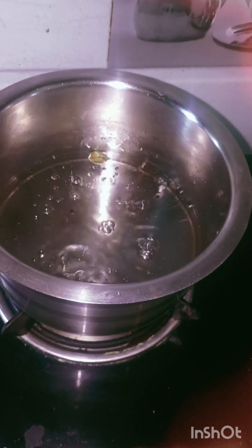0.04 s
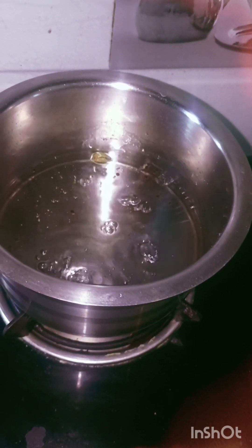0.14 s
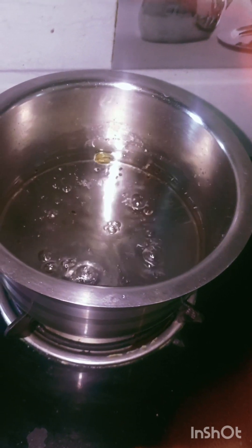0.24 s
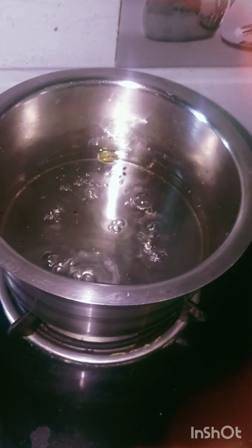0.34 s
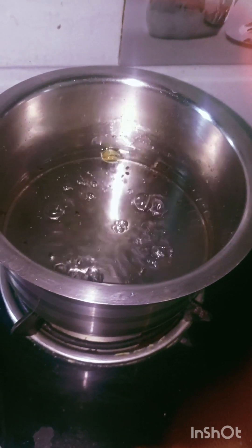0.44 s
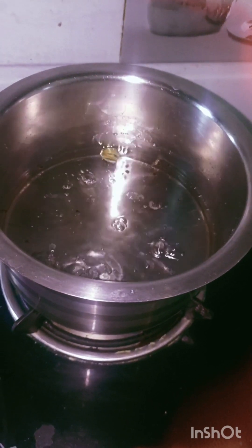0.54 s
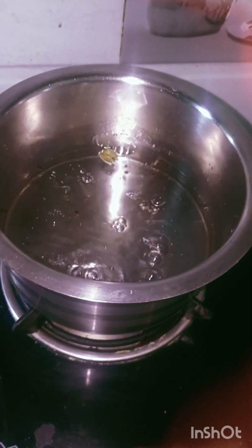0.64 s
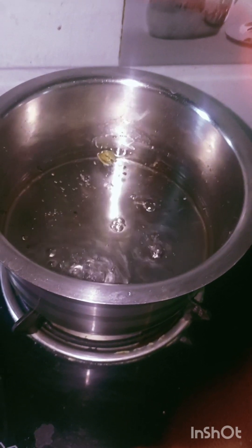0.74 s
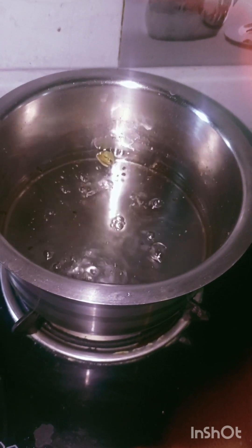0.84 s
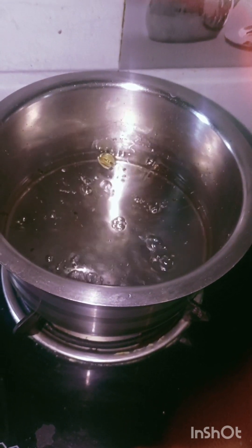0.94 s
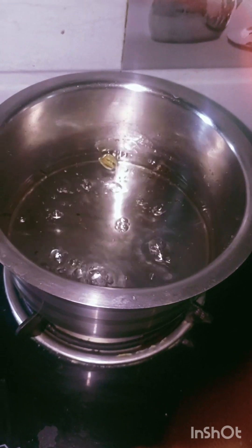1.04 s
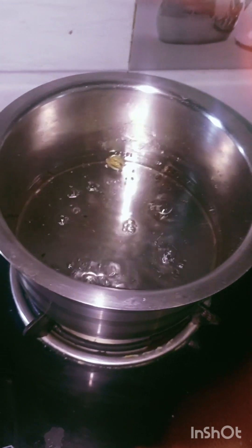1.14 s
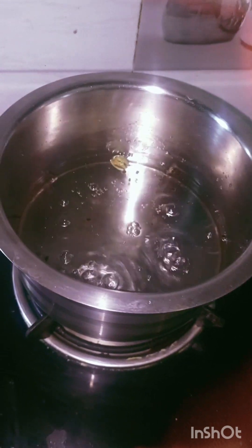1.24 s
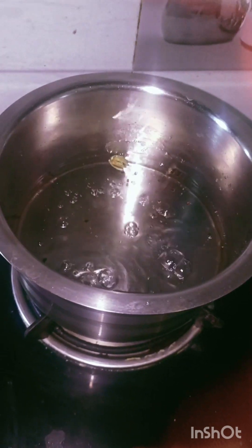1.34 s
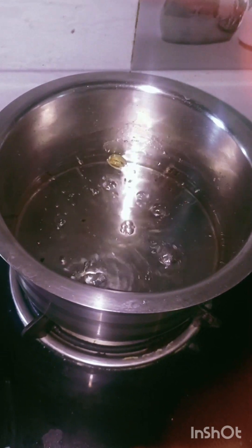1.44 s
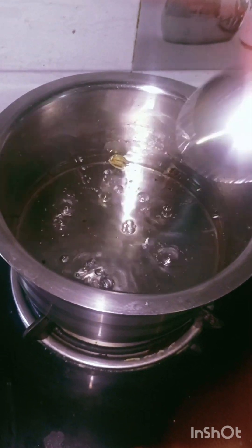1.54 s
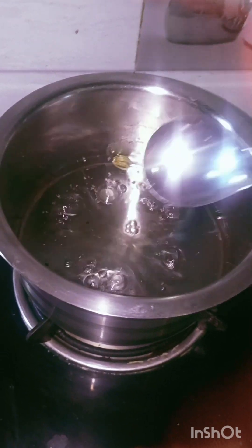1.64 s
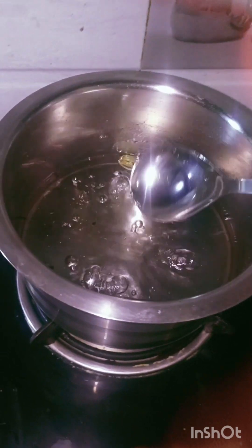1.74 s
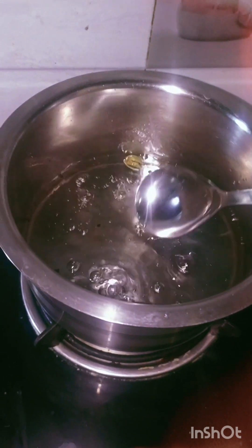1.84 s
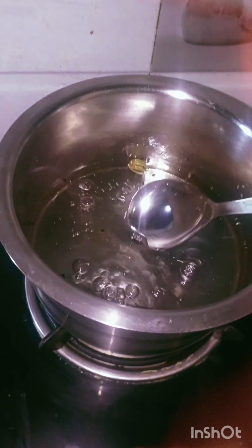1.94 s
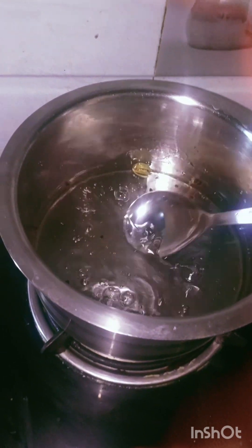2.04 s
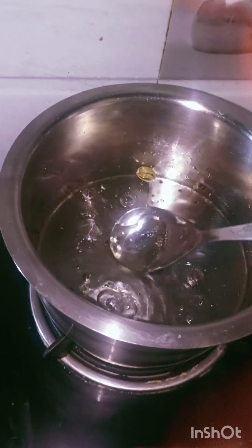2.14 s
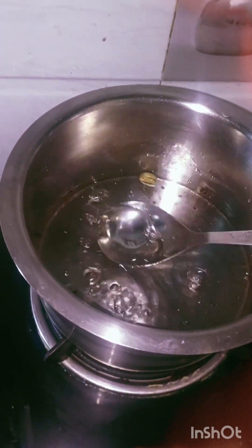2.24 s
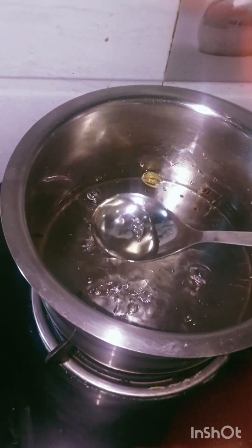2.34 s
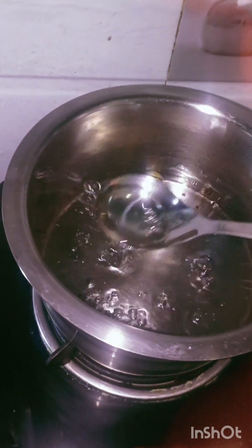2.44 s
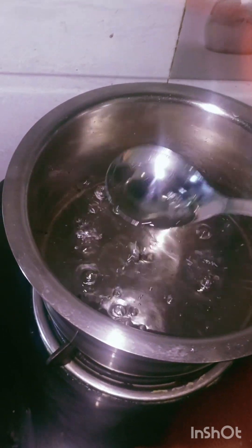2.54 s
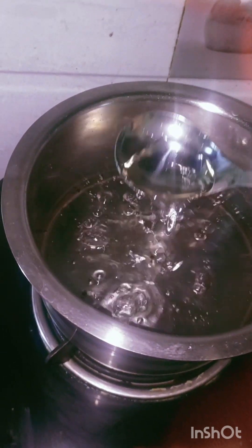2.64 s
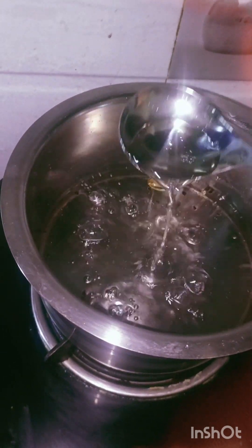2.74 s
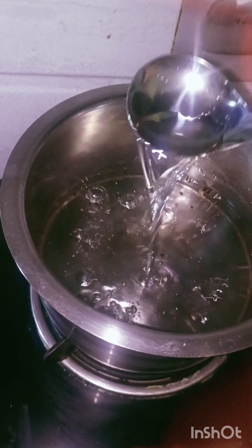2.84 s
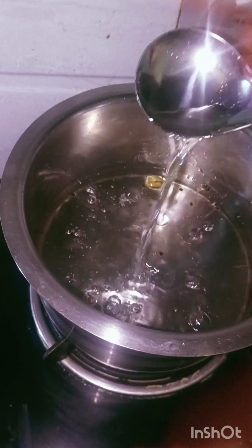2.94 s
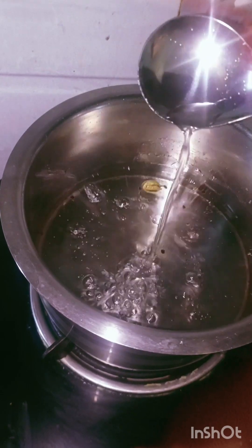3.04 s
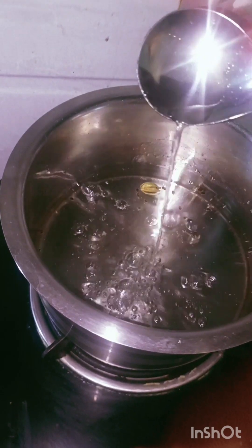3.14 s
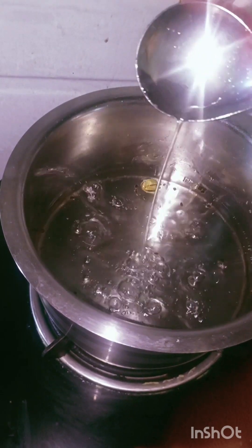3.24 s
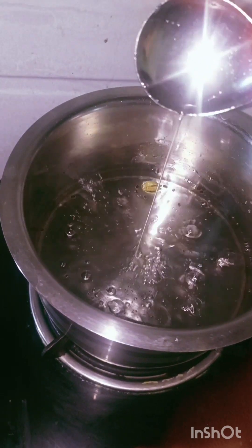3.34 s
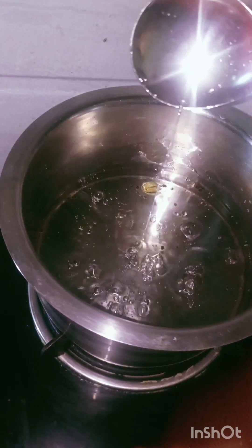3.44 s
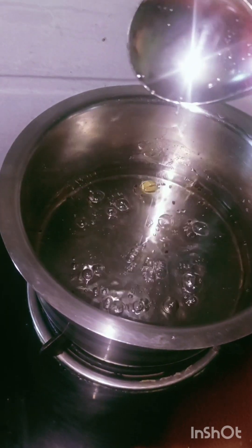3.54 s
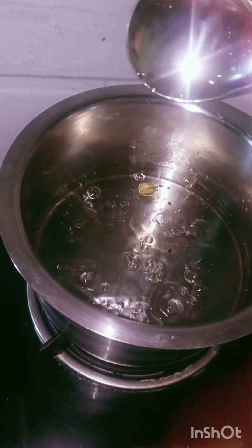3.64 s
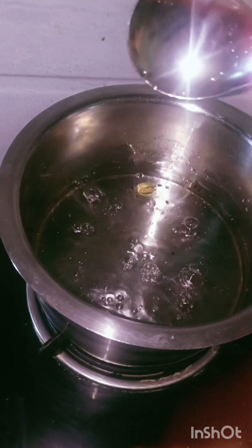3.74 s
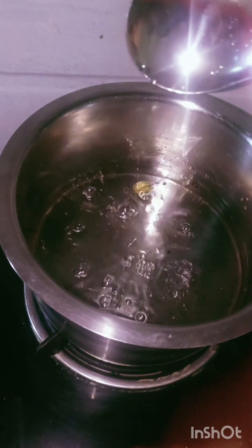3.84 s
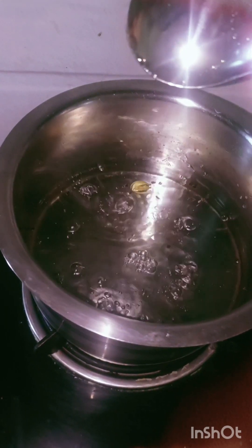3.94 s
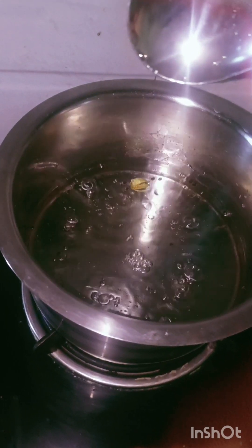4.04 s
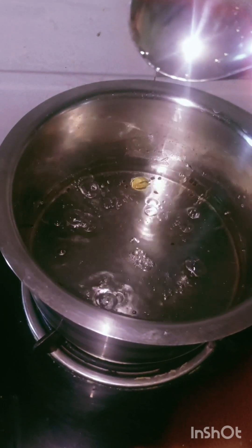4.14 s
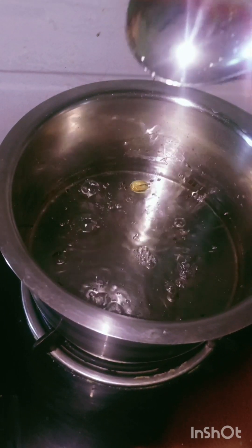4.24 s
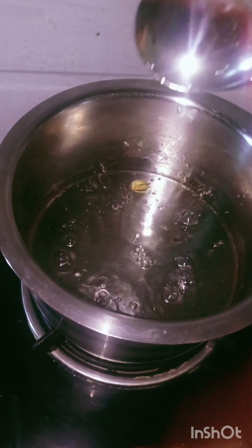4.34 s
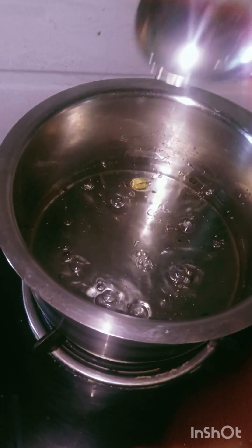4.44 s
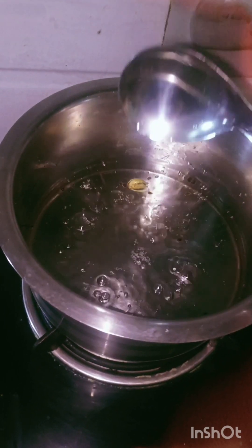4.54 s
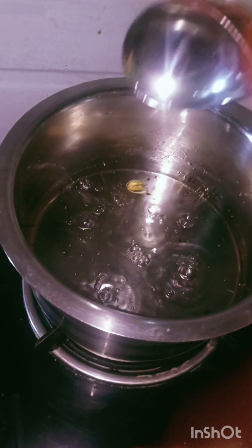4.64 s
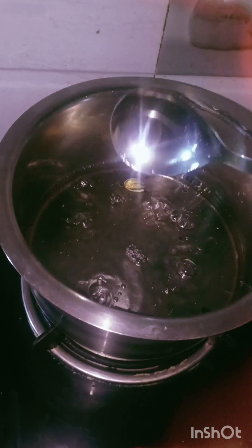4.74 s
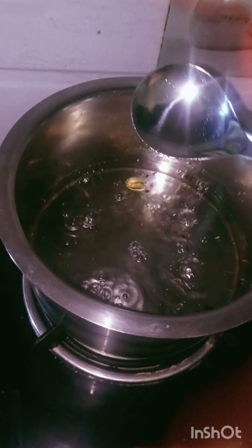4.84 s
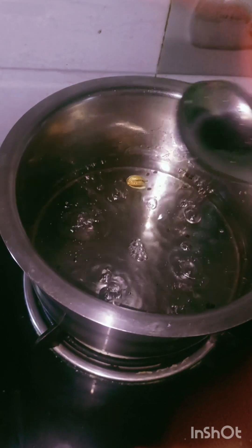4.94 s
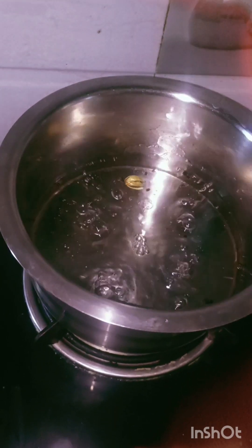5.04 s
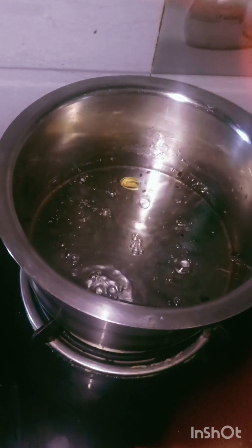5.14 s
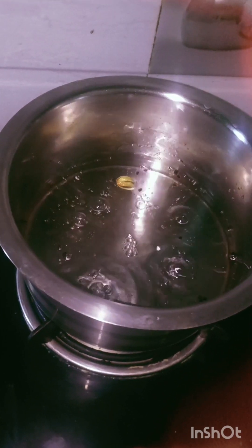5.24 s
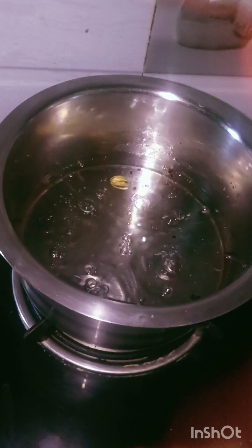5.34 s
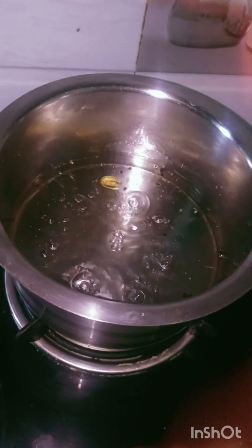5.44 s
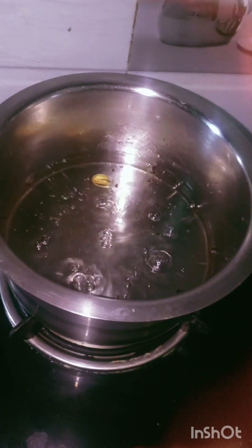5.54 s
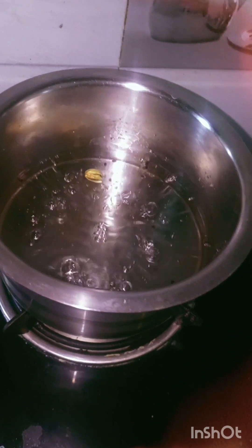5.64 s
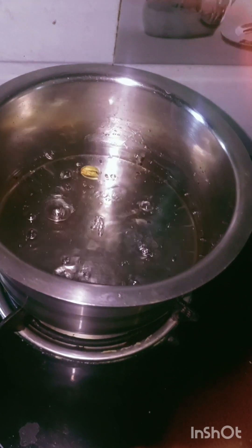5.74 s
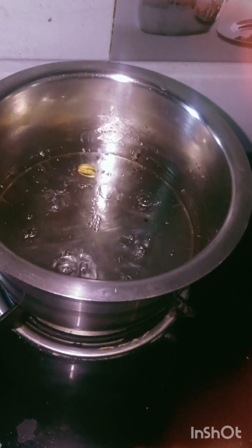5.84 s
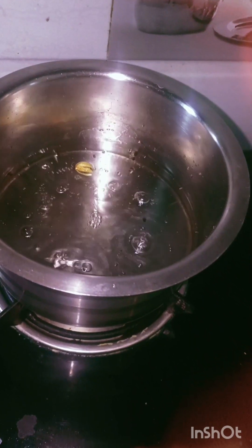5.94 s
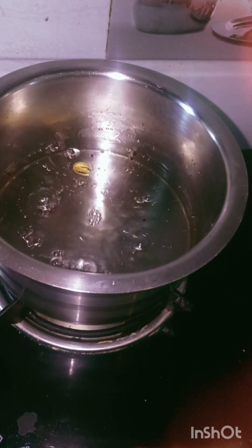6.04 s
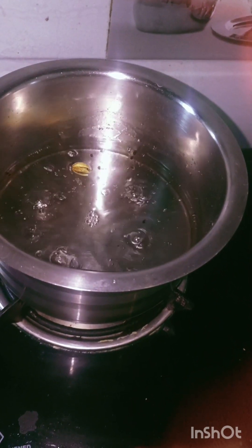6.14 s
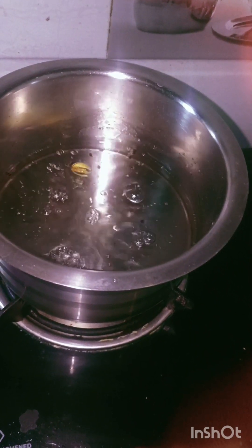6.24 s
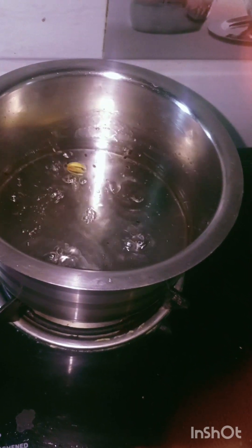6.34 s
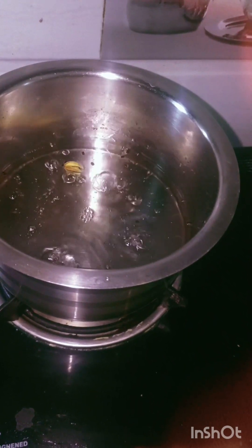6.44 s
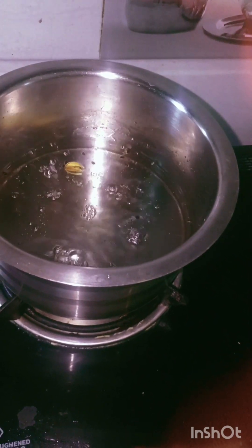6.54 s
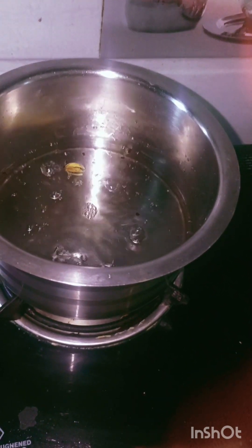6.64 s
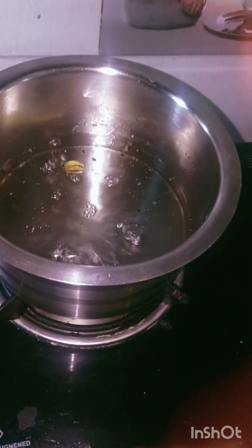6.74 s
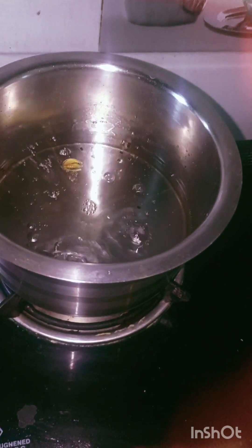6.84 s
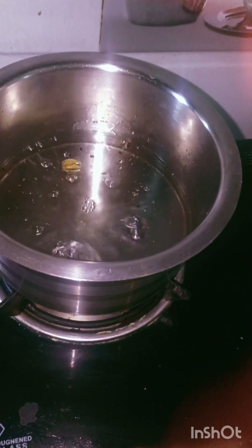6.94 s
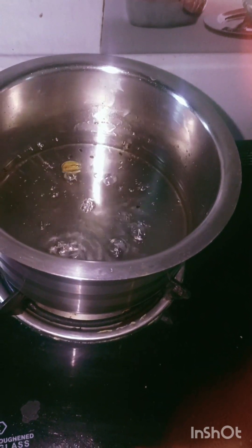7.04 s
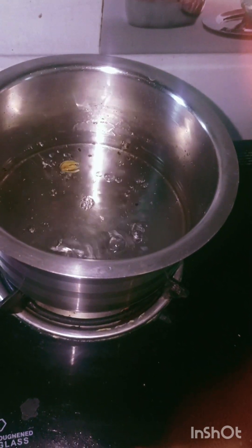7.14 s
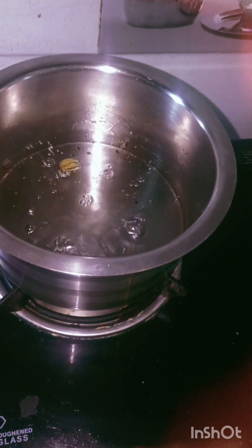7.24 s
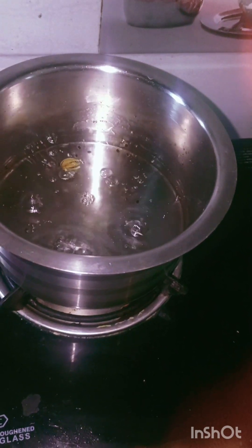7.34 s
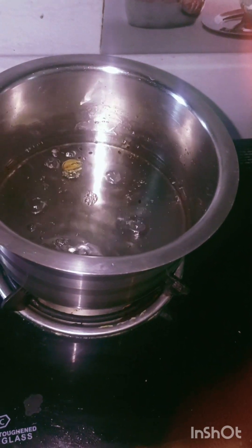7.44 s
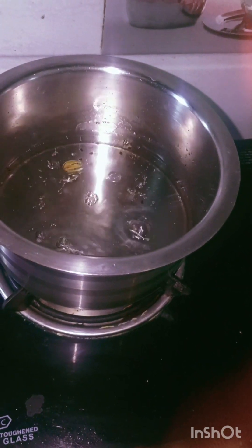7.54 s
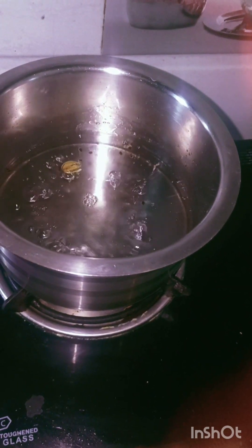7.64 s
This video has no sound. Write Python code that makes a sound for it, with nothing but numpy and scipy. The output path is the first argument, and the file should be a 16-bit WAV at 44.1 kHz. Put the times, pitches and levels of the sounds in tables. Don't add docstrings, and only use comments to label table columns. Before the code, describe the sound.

From 0 to 2 s, thick syrup simmers quietly in a steel pot near the microphone: soft uneven fizz, tiny sharp pops, duller bubbles, and a faint wall hum over a very low burner rumble. A faint drip comes near 1.1 s. At about 2.1 and 2.25 s a ladle knocks the pot, a hard clank then a deeper, brighter-edged one, with short ringing. Syrup falls back from 2.85 to 3.2 s in hollow gulps, the first loudest, with lively bubbling. From 3.5 to 5.5 s the boil is calmer, with scattered pops and a brief dip in hiss near 4.3. At 5.6 s a steel tray lands very loudly further off, bounces, and settles at 5.8. Dishes clatter densely at 6.13-6.3, again at 6.6 and 6.8, then weakly around 7. The echo is choked off, leaving faint puffs of hiss and small pops until about 7.7.

```python
import sys
import numpy as np
from scipy import signal
from scipy.fft import rfft, irfft, next_fast_len
from scipy.io import wavfile
from scipy.ndimage import uniform_filter1d

SR = 44100
rng = np.random.default_rng(int(sys.argv[2]) if len(sys.argv) > 2 else 0)


def store_wav(level_fs):
    pcm = np.round(np.clip(np.atleast_2d(level_fs), -1, 1) * 32767)
    wavfile.write(sys.argv[1], SR, pcm.T.astype(np.int16))


def gain_from_db(level_db):
    decades = np.asarray(level_db, float) / 20
    return 10 ** decades


N = 339479

# start_s, fizz_db, held_s
BOIL_SURGES = [(0.43, -55, 0), (0.58, -52, 0), (0.98, -48, 0.076), (1.2, -68.5, 0.44), (1.48, -59.5, 0.12),
               (1.76, -58.5, 0.077), (1.92, -48, 0), (2.06, -53.5, 0.69), (2.3, -41, 0.0097),
               (2.62, -62, 0.2), (2.86, -56.5, 0.5), (3.04, -47, 0.39), (3.19, -45, 0.04), (3.3, -65, 0.1),
               (3.61, -54, 0.12), (3.8, -63.5, 0.3), (4.5, -68, 1.4), (5.44, -59, 0), (5.64, -55.5, 1.62),
               (7.45, -61.5, 0)]
# freq_hz, level_db (per Hz)
FIZZ_COLOUR = [(530, -53.5), (900, -12), (1580, -2), (3880, -6), (5260, -11), (7200, -15), (9360, -44.5),
               (15800, -120)]
# freq_hz, level_db (per Hz)
HISS_COLOUR = [(4120, -7.5), (7000, -5), (9020, 3), (11000, -15), (15600, -13), (16400, -120)]
# freq_hz, level_db (per Hz)
AIR_COLOUR = [(15, -59), (43, -16), (102, 5), (252, -3.5), (352, -0.5), (1000, -9.5), (1100, -34),
              (2420, -120)]
# freq_hz, width_hz, level_db
POT_MODES = [(554, 8.4, -14), (812, 25, -6), (996, 12, -6.5), (1220, 54, 1.5), (1614, 41, -8.5),
             (2400, 56, -6.5), (2826, 14, -7.5), (2984, 24, 1), (3220, 23, 4.5), (3663, 78, -5),
             (4030, 62, -3), (4340, 43, -8.5), (5300, 400, -17)]
# start_s, peak_db, pitch_hz
SHARP_BUBBLES = [(0.0628, -51.5, 1135), (0.1268, -47.5, 5550), (0.236, -41, 5480), (0.428, -41, 2950),
                 (0.6347, -47, 4030), (0.9147, -46.5, 5350), (1.2071, -43.5, 4900), (1.283, -56.5, 1570),
                 (1.476, -38.5, 1630), (1.81, -50, 3830), (1.851, -49, 3640), (1.915, -43, 3820),
                 (2.0249, -40.5, 3100), (2.611, -37, 5650), (2.9703, -51, 4100), (3.163, -33, 3100),
                 (3.1885, -37, 2950), (3.087, -37.5, 3220), (3.3122, -49.5, 2600), (2.213, -45, 3500),
                 (3.36, -53, 5500), (3.5204, -45, 5350), (3.748, -48, 6000), (4.0163, -52, 3800),
                 (4.368, -49.5, 9070), (4.4808, -50, 3640), (4.6226, -50, 8100), (4.687, -51, 3440),
                 (5.194, -49, 3800), (5.207, -51, 3660), (5.0535, -52, 3780), (4.5753, -53, 5700),
                 (5.122, -52.5, 6800), (1.7545, -44, 2900), (5.3559, -43, 3660), (5.559, -46.5, 5300),
                 (7.215, -46, 1520), (7.6088, -49.5, 6260)]
# start_s, peak_db, pitch_hz
MUFFLED_BUBBLES = [(0.353, -63, 3640), (0.5617, -60, 3840), (0.766, -64.5, 1780), (0.9695, -53.5, 2040),
                   (1.4069, -58, 3320), (1.5813, -52.5, 5300), (1.666, -62.5, 3850), (1.7538, -58, 2960),
                   (2.721, -63, 3210), (3.028, -49, 2300), (3.099, -54, 3340), (3.467, -59.5, 1280),
                   (3.596, -46.5, 1445), (3.699, -60.5, 3540), (3.844, -60, 1140), (4.209, -58, 2450),
                   (4.5503, -58.5, 5640), (4.7865, -60, 3250), (5.039, -58.5, 3580), (5.083, -63, 5800),
                   (5.4243, -59.5, 1230), (5.484, -62.5, 4340), (7.1562, -72, 3670), (7.4385, -61.5, 5890),
                   (7.655, -61.5, 1220)]
# start_s, peak_db, pitch_hz
QUIET_MUFFLED_BUBBLES = [(3.9685, -54.5, 1130), (4.121, -57, 2400), (4.3969, -62, 6420), (4.572, -61, 5770),
                         (4.7343, -53.5, 3500), (4.818, -53, 4030), (4.85, -51, 4720), (4.8964, -48.5, 3220),
                         (4.982, -56, 3990), (5.1116, -50, 3900), (5.167, -53, 4770), (5.223, -50.5, 3330),
                         (5.421, -59, 1220), (5.5408, -63, 5220),
                         (0.0773, -53, 3900), (0.3654, -59, 1550), (0.5147, -63, 3010), (0.5895, -50.5, 1550),
                                (0.8275, -56, 3000), (0.8903, -50, 4140), (0.994, -45, 1630), (1.0286, -55, 3530),
                                (1.1517, -60.5, 2980), (1.2768, -57, 1600), (1.3199, -56, 1620), (1.461, -49.5, 3500),
                                (1.424, -54, 3550), (1.567, -47, 2430), (1.601, -48.5, 3050), (1.629, -56, 1540),
                                (1.739, -49, 2880), (1.944, -50, 5000), (2.411, -47, 3260)]
# start_s, peak_db, pitch_hz
SYRUP_DRIPS = [
    (1.076, -52.5, 528),
    (2.855, -31, 821),
    (2.896, -38, 808),
    (3.063, -43.5, 834),
    (3.1, -38, 817),
    (3.164, -36, 836),
    (3.212, -37, 813),
]
# times_pitch, level_db, t60_s
POT_AIR_MODES = [(1, 1.5, 0.11), (1.13, -3, 0.053), (1.22, -9, 0.082), (0.81, -15, 0.24), (2.08, -8, 0.04)]
# start_s, hum_db, held_s
HUM_SWELLS = [(0.47, -61.5, 0.039), (0.97, -66, 0.061), (1.17, -52.5, 0), (1.92, -64.5, 0.078),
              (2.13, -49.5, 0.019), (2.27, -47, .15), (2.6, -62, 0), (2.92, -53, .11), (3.23, -51.5, 0.09),
              (3.63, -53, 0.036), (4.47, -62.5, 0), (4.74, -60.5, 0.026), (5.48, -62, 0.063),
              (5.64, -47, 0.13), (5.74, -37.5, 0.015), (5.9, -55, 0.074), (5.2, -76, 0.15),
              (6.2, -49.5, 0.066), (6.66, -61, 0.069), (6.86, -59.5, 0.17), (7.02, -52.5, 0.081),
              (3.87, -69.5, 0.0067), (1.39, -70, 0.072), (1.79, -74.5, 0.017), (4.84, -70, 0.053)]
# freq_hz, level_db (per Hz)
HUM_COLOUR = [(270, -120), (306, -23.5), (334, -26), (349, -6.5), (364, -29.0), (420, -44.0), (500, -47.5),
              (522, -24.5), (545, -48.0), (620, -120)]
# start_s, rumble_db, held_s
BURNER_SWELLS = [
    (2.32, -54.5, .02),
    (3.88, -71, 0.041),
    (4.21, -63.5, 0.29),
    (4.88, -77, 0.031),
    (2.58, -70.5, 0.023),
    (5.73, -66.5, 0.23),
    (6.45, -70, 0.047),
    (7.33, -55, 0.025),
]
# freq_hz, level_db (per Hz)
BURNER_COLOUR = [(25, -120), (40, -19.0), (70, -4.5), (85, 9.0), (100, -5.0), (160, -21.0), (250, -120)]
# start_s, peak_db, low_knock_db, treble_db
LADLE_HITS = [
    (2.08, -33, -17, -29),
    (2.0878, -15.5, -4, -27),
    (2.2524, -32, -14, -20),
    (2.268, -18.5, 9.5, -42),
]
# freq_hz, level_db (per Hz)
LADLE_COLOUR = [(88, -40), (240, -27), (420, 7), (700, -2.5), (2600, -6.5), (4320, -19.5), (6910, -13),
                (16000, -53)]
# freq_hz, t60_s
POT_DECAY = [(100, 0.94), (400, 1), (1200, 0.58), (4000, 0.53), (15000, 0.98)]
# start_s, pitch_hz, level_db, t60_s
STEEL_RINGS = [(2.092, 3200, -41.5, 0.16), (2.2523, 4330, -34, 0.09), (2.26, 1200, -53.5, 0.91),
               (5.616, 3120, -20, 0.053), (5.822, 4170, -39, .07), (5.8223, 3400, -27, 0.054),
               (5.8226, 1100, -37.5, 0.077), (2.2525, 5400, -39, 0.051), (2.2523, 6150, -41, 0.042),
               (2.0885, 520, -35.5, 0.16), (3.031, 3200, -45.5, 0.15), (3.187, 2950, -44.5, 0.14),
               (6.1787, 5700, -26.5, 0.065), (6.1787, 5300, -24.5, 0.06), (6.213, 4710, -23, 0.1),
               (2.27, 350, -43.5, 0.4), (2.2535, 3220, -45, 0.063), (2.262, 4350, -53, 0.45),
               (2.0882, 760, -37, 0.06), (3.06, 830, -50, 0.35), (3.164, 1500, -45, 0.028),
               (2.2545, 2000, -46, 0.06), (5.616, 4170, -25, 0.052), (5.615, 5400, -22.5, 0.041)]
# start_s, peak_db, pitch_hz, swell_s
SOFT_BUMPS = [(.43, -60, 950, 0.0088), (1.61, -58.5, 1150, 0.021), (3.219, -54, 258, 0.012),
              (3.61, -69, 460, 0.028), (2.1, -39.5, 487, 0.0079), (2.271, -41, 328, 0.028),
              (2.27, -50, 150, 0.045), (2.856, -50.5, 1250, 0.0096), (4.85, -64, 1330, 0.026),
              (1.079, -58, 654, 0.021), (5.661, -38, 470, 0.025), (5.69, -43, 163, 0.027),
              (6.159, -39, 480, 0.049), (6.62, -45.5, 535, 0.026), (6.807, -51, 545, 0.014),
              (7.101, -65, 514, 0.011)]
# start_s, peak_db, low_knock_db, treble_db
TRAY_HITS = [
    (5.6158, -8.5, -19, -9),
    (5.652, -21, -6.5, -26.5),
    (5.68, -17.5, -13, -23.5),
    (5.698, -14.5, -10.5, -15),
    (5.8223, -19.5, -14.5, -10.5),
]
# freq_hz, width_hz, level_db
TRAY_MODES = [(1186, 66, 4), (1550, 36, 10.5), (1865, 62, -2), (2150, 98, 5), (2590, 67, -5.5),
              (2950, 100, 6.5), (3210, 110, -9), (3640, 110, -6.5), (4174, 130, -8), (4600, 90, -3.5),
              (5350, 60, -1), (5640, 60, -3.5), (5860, 140, -7.5)]
# freq_hz, level_db (per Hz)
TRAY_COLOUR = [(150, -15.5), (254, -25), (341, 12), (1040, -14), (1530, -8.5), (3200, -4.5), (5570, -14),
               (7620, -27.5), (10800, -38), (16000, -37.5)]
# start_s, peak_db, low_knock_db, treble_db
DISH_HITS = [(6.1324, -16, -14.5, -12), (6.1482, -18.5, -10.5, -39), (6.1787, -15, -17, -12),
             (6.2045, -15.5, -24.5, -17), (6.2165, -14, -33, -14), (6.227, -17.5, -23, -19),
             (6.2504, -24.5, -6.5, -5), (6.269, -19.5, -13.5, -14.5), (6.5941, -18, -19.5, -11.5),
             (6.612, -23, -21.5, -17), (6.632, -22, -26, -14.5), (6.652, -22.5, -14.5, -14.5),
             (6.783, -24.5, -53, -14.5), (6.8013, -27.5, -19, -15.5), (6.82, -35, -10.5, -15),
             (6.9184, -35, -13, -11), (7.0, -35.5, -12, -11), (7.0069, -33, -14, -33),
             (7.035, -36.5, -5.5, -18.5)]
# freq_hz, width_hz, level_db
DISH_MODES = [(316, 27, 8), (728, 26, 2.5), (1233, 90, -2), (1526, 49, 1.5), (2149, 37, -6.5),
              (2360, 22, 1.5), (2657, 35, -6), (2962, 47, 1.5), (3220, 105, -8.5), (3500, 110, 5),
              (3890, 20, -2), (4760, 40, 1), (5350, 65, -3.5), (5700, 130, 3.5),
              (6160, 36, -3), (8200, 75, -0.5), (12000, 120, 6), (13050, 130, 5.5), (14500, 370, 3.5)]
# freq_hz, level_db (per Hz)
DISH_COLOUR = [(150, -13), (254, -15.5), (341, 6.5), (1040, -15.5), (1210, -10), (1390, -17.5), (1530, -3),
               (3550, -6.5), (5570, -10.5), (7620, -26), (10800, -33.5), (11600, -43.5), (16000, -40)]
# freq_hz, t60_s
KITCHEN_DECAY = [(100, 0.6), (400, 0.93), (1200, 1), (4000, 0.84), (8000, 0.89), (15000, 0.65)]
# time_s, level_db
LAST_TAIL_CUT = [
    (0, 17),
    (7.06, 2),
    (7.17, -2),
    (7.7, -24.5),
]
# start_s, peak_db
TREBLE_PUFFS = [(0.162, -71), (0.2553, -82), (0.342, -79), (0.3676, -69), (0.4279, -66), (0.5866, -62),
                (0.6302, -53.5), (0.6679, -74), (0.7267, -69), (0.778, -65), (0.9398, -59), (0.9837, -58),
                (1.059, -57.5), (1.197, -58.5), (1.2146, -57), (1.3872, -66), (1.494, -68), (1.5388, -57.5),
                (1.8507, -58.5), (1.914, -58.5), (1.952, -61), (2.0887, -38.5), (2.131, -51), (2.1919, -63),
                (2.2528, -31.5), (2.4097, -56.5), (2.5062, -60), (2.534, -65.5), (2.585, -58), (2.61, -51),
                (2.676, -52.5), (2.8499, -63.5), (2.9053, -54), (2.9713, -54), (3.0203, -50),
                (3.0898, -40.5), (3.103, -53), (3.068, -55), (3.1887, -51), (3.259, -69), (3.3585, -60),
                (3.4638, -54.5), (3.5225, -57.5), (3.5495, -57), (3.6726, -73), (3.7466, -56.5),
                (3.799, -64), (3.8412, -59), (3.912, -62), (3.9838, -80), (4.103, -59), (4.3246, -70),
                (4.369, -65.5), (4.4594, -58), (4.4973, -58), (4.6109, -60), (4.9791, -70), (5.017, -55),
                (5.2014, -52.5), (5.2795, -79), (5.4228, -60), (5.4705, -64), (5.4954, -68),
                (5.5424, -62.5),
                (7.1705, -86), (7.27, -70.5), (7.323, -67.5), (7.463, -67.5), (7.5276, -65.5),
                      (7.565, -64), (7.6133, -65.5)]
# freq_hz, level_db
PUFF_COLOUR = [(1000, -24.5), (2500, -9.5), (6000, 5.5), (7000, -10.0), (9000, 1.0), (11000, -7.5),
               (15800, -2.0), (16300, -120)]
# freq_hz, threshold_db
FILTER_THRESHOLD = [(100, -67), (500, -57.5), (1000, -76.5), (1300, -88), (6000, -77.5), (8000, -83),
                    (15000, -57.5)]
# freq_hz, likeness
MIC_LIKENESS = [(60, 0.28), (130, 0.97), (290, 0.76), (640, 0.65), (1410, 0.069), (3100, 0.41), (6820, 0.3),
                (15000, 0.36)]
# freq_hz, left_minus_right_db
MIC_LEAN = [(60, 1), (700, -0.5), (1300, 2.5), (2400, -1), (3800, -2.5), (5700, -8.5), (6900, -10.5),
            (7900, 18.5), (9000, 22.5), (10000, 22), (11500, 3.5), (15000, 5)]
# freq_hz, gain_db
BAND_LIMIT = [(16000, 0), (16250, -22), (17000, -45)]


def simmer():
    boil_db = swells(BOIL_SURGES, rise=188, fall=350, rest_db=-71.5)
    fizz = coloured(noise(N, gates(depth_db=8, shared_db=0.0, hold_s=0.025, size=2)), FIZZ_COLOUR)
    fizz = rung(fizz * crackle(rate=55, life_s=0.009), POT_MODES, between_db=-16, sharp=1.1)
    fizz = gain_from_db(boil_db - 7.0) * unit(fizz)
    hiss = coloured(noise(N, gates(depth_db=8.0, shared_db=4.0, hold_s=0.018, size=4)), HISS_COLOUR)
    hiss = gain_from_db(0.41 * boil_db - 47.5) * hiss
    air = coloured(noise(N, gates(depth_db=2, shared_db=1.5, hold_s=0.05, size=1)), AIR_COLOUR)
    return gap() * (fizz + hiss) + gain_from_db(-77.5) * air


def crackle(rate, life_s):
    size = gain_from_db(2.6 * np.minimum(rng.exponential(size=N), 2.2))
    starts = (rng.random(N) < rate / SR) * size
    return unit(0.9 + signal.lfilter([1], [1, -np.exp(-1 / (life_s * SR))], starts))


def bubbles():
    out = np.zeros((2, N))
    for s, db, hz in SHARP_BUBBLES:
        add(out, s, gain_from_db(db) * burst(hz, cycles=2.34, width=0.13, t60=0.077, wet_db=-12.5))
    pops = [(s, db - 13.0, hz) for s, db, hz in QUIET_MUFFLED_BUBBLES]
    ping_db = -22
    for s, db, hz in MUFFLED_BUBBLES + pops:
        add(out, s, gain_from_db(db + ping_db) * burst(hz, cycles=1.0, width=0.16, t60=0.14, wet_db=-ping_db))
    return out


def burst(hz, cycles, width, t60, wet_db):
    t = np.arange(SR // 6) / SR
    u = t * hz / cycles
    ping = 5 * (u * np.exp(-u)) ** 2 * np.sin(2 * np.pi * hz * t * (1.003 + 0.012 * u))

    def answer(f, s):
        near = np.exp(-0.5 * (np.log((f + 1) / hz) / width) ** 2) + 0.0028
        return near * resonances(POT_MODES, f, between_db=-14.5, sharp=1.0) * gain_from_db(-60 * s / t60)

    tail = noise(len(t), answer, order=512)
    tail = gain_from_db(wet_db) * tail * (1 - np.exp(-t / 0.001)) / np.std(tail[:, :400])
    return ping * lean(hz)[:, None] + tail


def drips():
    out, t = np.zeros((2, N)), np.arange(SR // 6) / SR
    for s, db, hz in SYRUP_DRIPS:
        ring = 0
        for ratio, level, t60 in POT_AIR_MODES:
            phase = 0.15 * rng.random((2, 1))
            fade = gain_from_db(level + rng.normal(0, 1.0) - 60 * t / t60)
            ring = ring + fade * np.sin(2 * np.pi * (hz * ratio * t + phase))
        ring = 0.58 * ring * (1 - np.exp(-t / 0.00047))
        splash = gain_from_db(-22.0) * burst(hz, cycles=4.2, width=0.33, t60=0.33, wet_db=7)
        add(out, s, gain_from_db(db) * (ring + splash))
    return out


def hum():
    hum_db = swells(HUM_SWELLS, rise=390, fall=395, rest_db=-80)
    wall = coloured(rng.standard_normal(N), HUM_COLOUR)
    beat = np.abs(signal.hilbert(wall))
    wall = unit(wall / (beat + 0.89))
    return gain_from_db(hum_db + [[-1.5], [1.5]]) * wall


def ladle():
    return clatter(LADLE_HITS, POT_MODES, LADLE_COLOUR, POT_DECAY, between_db=-10.0, wet_db=-18.5,
                   crack_s=0.082, rise_s=0.00075)


def clatter(hits, modes, tone, room, between_db, wet_db, crack_s, rise_s):
    out, t = np.zeros((2, N)), np.arange(SR * 3 // 4) / SR
    short = len(t) // 4
    for s, db, low_db, high_db in hits:
        blow = [(170, low_db - 19.0), (340, low_db + 0.0), (800, low_db + 13.5), (1100, 0.017), (5600, 0.023),
                (7600, high_db + 17.5), (10500, high_db + 24.5), (15500, high_db + 28.5)]

        def colour(f, u):
            return gain_from_db(along(tone, f) + along(blow, f))

        def echo(f, u):
            return colour(f, u) * gain_from_db(-60 * u / along(room, f))

        crack = np.pad(unit(noise(short, colour)), [(0, 0), (0, len(t) - short)])
        crack = 0.88 * crack * gain_from_db(-60 * t / crack_s) * (1 - np.exp(-t / rise_s))
        tail = noise(len(t), echo)
        tail = gain_from_db(wet_db) * tail / np.std(tail[:, :2000]) * (1 - np.exp(-t / 0.0011))
        add(out, s, gain_from_db(db) * (crack + tail))
    return shut(rung(out, modes, between_db, sharp=1.73))


def rings():
    out, t = np.zeros((2, N)), np.arange(SR // 2) / SR
    blur = 0.04
    for s, hz, db, t60 in STEEL_RINGS:
        steps = rng.standard_normal((2, 1, len(t)))
        drift = np.cumsum(steps, axis=2) * np.sqrt(blur * hz / SR) / (2 * np.pi)
        turns = hz * t * [[[1]], [[1.012]]] + drift + rng.random((2, 2, 1))
        pair = np.sin(2 * np.pi * turns).sum(axis=0)
        add(out, s, gain_from_db(db - 60 * t / t60) * lean(hz)[:, None] * pair * (1 - np.exp(-t / 0.00039)))
    return out


def thuds():
    out, t = np.zeros((2, N)), np.arange(SR // 2) / SR
    for s, db, hz, swell_s in SOFT_BUMPS:
        def near(f, u):
            return np.exp(-0.5 * (np.log((f + 1) / hz) / 0.48) ** 2) + 0 * u

        bump = unit(noise(len(t), near, order=2048))
        add(out, s, gain_from_db(db) * bump * np.e * t / swell_s * np.exp(-t / swell_s))
    return out


def tray():
    return clatter(TRAY_HITS, TRAY_MODES, TRAY_COLOUR, KITCHEN_DECAY, between_db=-7.0, wet_db=-15.0,
                   crack_s=0.064, rise_s=0.00043)


def dishes():
    clash = clatter(DISH_HITS, DISH_MODES, DISH_COLOUR, KITCHEN_DECAY, between_db=-9.5,
                    wet_db=-18.0, crack_s=0.13, rise_s=0.00071)
    time_s, level_db = np.transpose(LAST_TAIL_CUT)
    return gain_from_db(np.interp(np.arange(N) / SR, time_s, level_db)) * clash


def burner():
    rumble_db = swells(BURNER_SWELLS, rise=110, fall=90, rest_db=-85.5)
    middle, side = coloured(rng.standard_normal((2, N)), BURNER_COLOUR)
    return gain_from_db(rumble_db) * unit(middle + 0.12 * side * [[1], [-1]])


def puffs():
    out, t = np.zeros((2, N)), np.arange(SR // 16) / SR
    faint = rng.random((90, 2)) * [N / SR, 6] - [0, 80]
    timed = np.array(TREBLE_PUFFS) - [0, 9.5]
    for s, db in np.vstack([timed, faint]):
        held_s = 0.013 * gain_from_db(np.clip(rng.normal(0, 4), -7, 4))
        patches = gates(depth_db=3, shared_db=5, hold_s=0.008, size=6)

        def treble(f, u):
            return gain_from_db(along(PUFF_COLOUR, f)) * patches(f, u)

        block = unit(noise(len(t), treble))
        tick = 2.8 * gain_from_db(-60 * t / 0.003)
        add(out, s, gain_from_db(db + 4.0) * block * (1 / (1 + (t / held_s) ** 6) + tick))
    return out


def gates(depth_db, shared_db, hold_s, size):
    def shape(hz, s):
        band = np.arange(len(hz)) // size
        jumps = rng.random((band[-1] + 2, len(s))) < s[1] / hold_s
        step = np.cumsum(jumps, axis=1)
        gain = np.take_along_axis(rng.standard_normal(step.shape), step, axis=1)
        gain = uniform_filter1d(gain, size=2, axis=1)
        shared = shared_db * np.clip(gain[-1], -2, 1)
        return gain_from_db(np.clip(depth_db, 0, 5) * gain[band] + shared)
    return shape


def gap():
    middle_s, half_s, depth_db = 4.283, 0.04, -12
    return gain_from_db(depth_db / (1 + ((np.arange(N) / SR - middle_s) / half_s) ** 8))


def shut(x):
    hz, _, z = signal.stft(x, SR, nperseg=512)
    power = uniform_filter1d(np.mean(np.abs(z) ** 2, axis=0), size=3, axis=0)
    power = np.abs(uniform_filter1d(power, size=5, axis=1))
    threshold = gain_from_db(2 * along(FILTER_THRESHOLD, hz))[:, None]
    return signal.istft(z * power / (power + threshold), SR, nperseg=512)[1][:, :N]


def sharpen(x, strength):
    hz, _, z = signal.stft(x, SR, nperseg=1024, noverlap=768)
    lasting = uniform_filter1d(np.abs(z) ** 2, size=2, axis=1)
    lasting = np.abs(uniform_filter1d(lasting, size=9, axis=2)) + 1e-16
    gain = np.clip((lasting / uniform_filter1d(lasting, size=21, axis=1)) ** strength, 0.2, 2)
    band = uniform_filter1d(lasting.mean(axis=0), size=4, axis=0)
    weak = band < 0.2 * uniform_filter1d(band, size=40, axis=0)
    empty = weak & (hz[:, None] > 3400)
    z = z * gain * np.where(empty, 0.1, 1)
    return signal.istft(z, SR, nperseg=1024, noverlap=768)[1][:, :N]


def noise(size, shape, order=256):
    hz, s, z = signal.stft(rng.standard_normal((2, size)), SR, nperseg=order)
    hz = hz[:, None]
    alike = along(MIC_LIKENESS, hz)
    turn = np.exp(0.5j * np.arccos(np.clip(1.1 * alike, -1, 1)))
    stray = 0.9 * np.sqrt(np.clip(1 - alike, 0, 1)) * z[1]
    pair = np.array([z[0] * turn + stray, z[0] / turn - stray]) * lean(hz)
    return signal.istft(pair * shape(hz, s), SR, nperseg=order)[1][:, :size]


def lean(hz):
    gain = gain_from_db(np.multiply.outer([0.5, -0.5], along(MIC_LEAN, hz)))
    return gain / np.sqrt(np.mean(gain ** 2, axis=0))


def rung(x, modes, between_db, sharp):
    m = next_fast_len(N + SR // 2)
    wall = resonances(modes, np.fft.rfftfreq(m, 1 / SR), between_db, sharp)
    return irfft(rfft(x, m) * wall, m)[..., :N]


def resonances(modes, f, between_db, sharp):
    total = gain_from_db(between_db)
    for k, (centre, width, db) in enumerate(modes):
        damping = 1j * f * width / sharp
        total = total + (-1) ** k * gain_from_db(db / 2) * damping / (centre * centre - f * f + damping)
    return total


def swells(rows, rise, fall, rest_db):
    t = np.arange(0, N + 64, 64) / SR
    s, db, held = np.transpose(rows)[:, :, None]
    each = db - rise * np.maximum(s - t, 0) - fall * np.maximum(t - s - np.abs(held), 0)
    return np.interp(np.arange(N) / SR, t, np.maximum(each.max(axis=0), rest_db))


def filtered(x, points):
    m = next_fast_len(N + 8192)
    return irfft(rfft(x, m) * gain_from_db(along(points, np.fft.rfftfreq(m, 1 / SR))), m)[..., :N]


def coloured(x, points):
    return unit(filtered(x, points))


def along(points, hz):
    f, v = np.transpose(points)
    return np.interp(np.log(hz + 1), np.log(f + 1), v)


def unit(x):
    return x / np.sqrt(np.mean(x ** 2) + 1e-20)


def add(track, s, x):
    part = track[:, round(s * SR):][:, :x.shape[1]]
    part += x[:, :part.shape[1]]


def scene():
    pot = simmer() + bubbles() + drips() + hum()
    knocks = ladle() + rings() + thuds()
    aside = gain_from_db([[1.2], [-1.2]])
    return pot + knocks + aside * (tray() + dishes()) + burner() + gap() * puffs()


def top_cut(x):
    return signal.sosfilt(signal.butter(12, 17000, fs=SR, output="sos"), x)


def record(dry):
    heard = signal.sosfilt(signal.butter(2, 45, "high", fs=SR, output="sos"), dry)
    mix = sharpen(filtered(heard, BAND_LIMIT), strength=0.12)
    return top_cut(mix)


dry = scene()
out = record(dry)
store_wav(out)
```